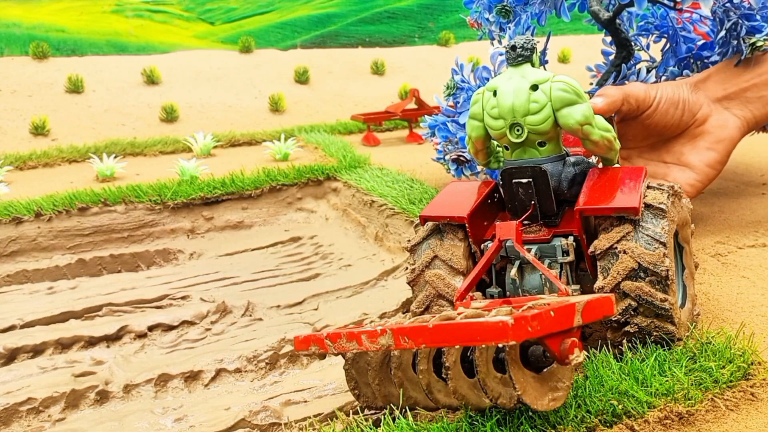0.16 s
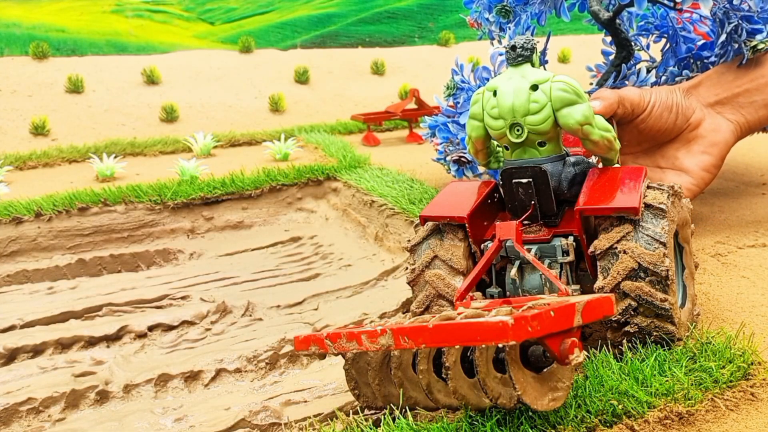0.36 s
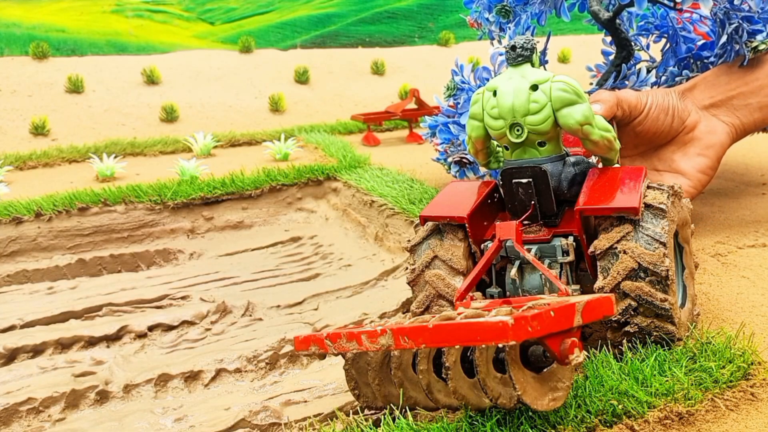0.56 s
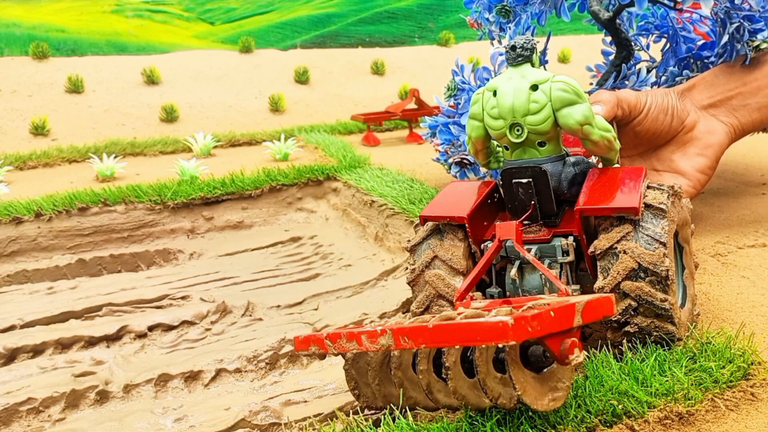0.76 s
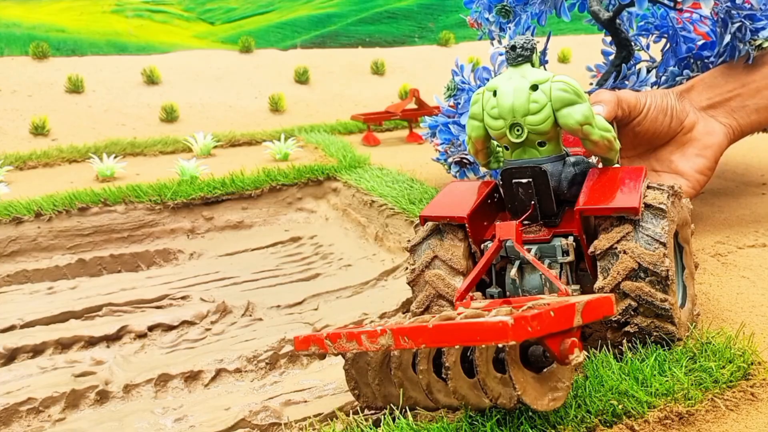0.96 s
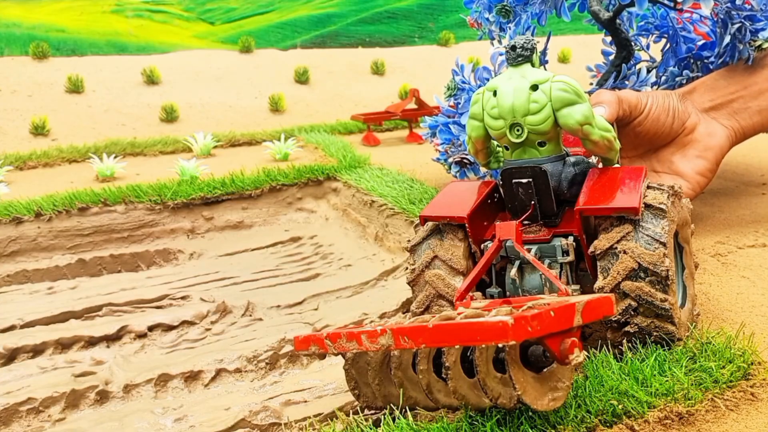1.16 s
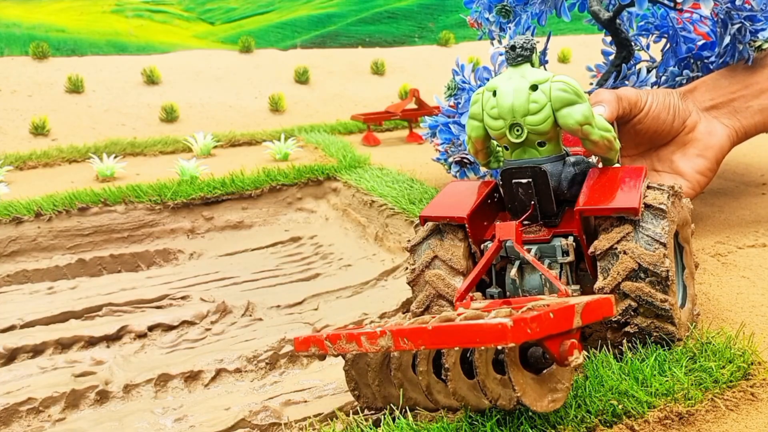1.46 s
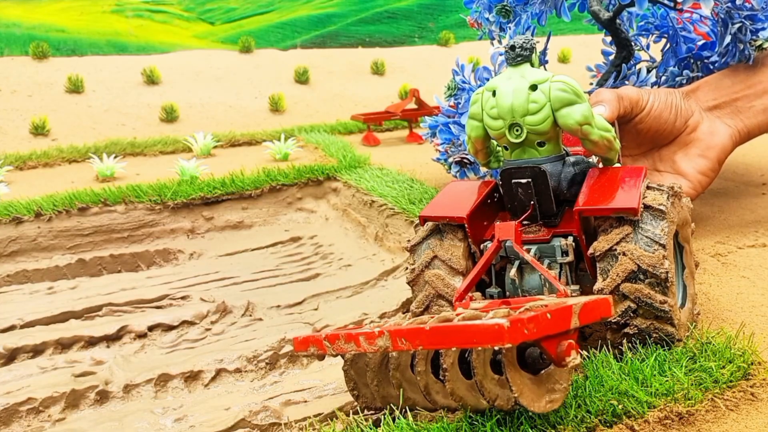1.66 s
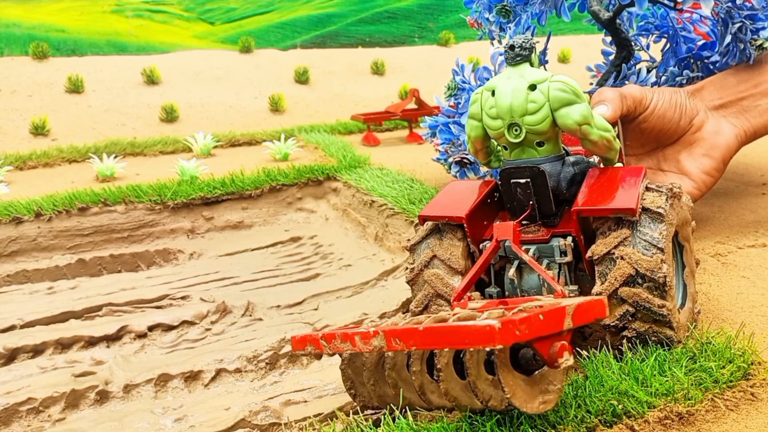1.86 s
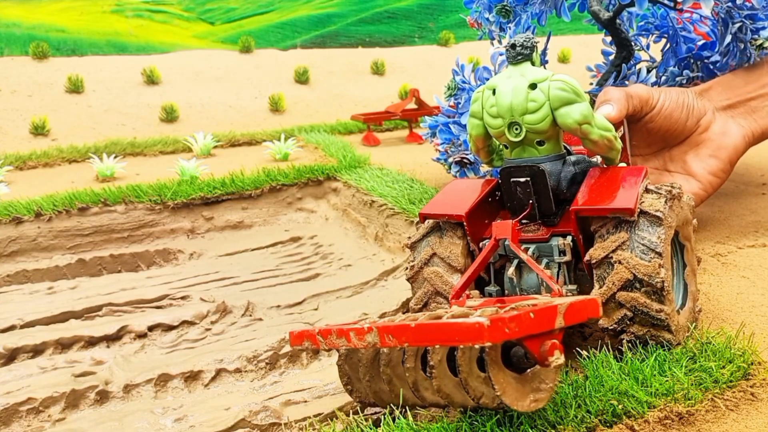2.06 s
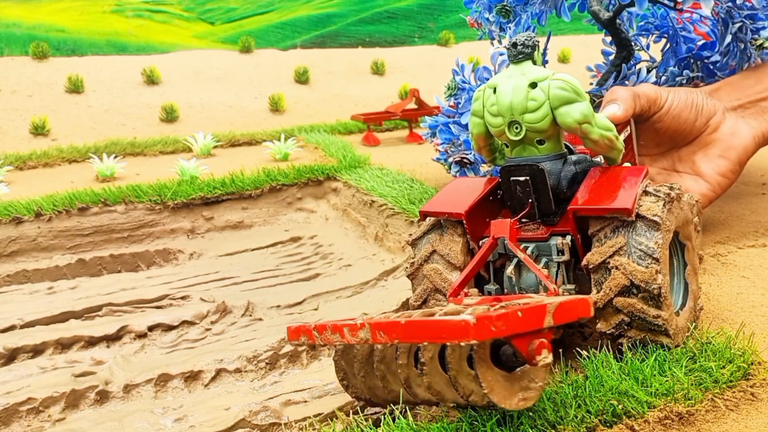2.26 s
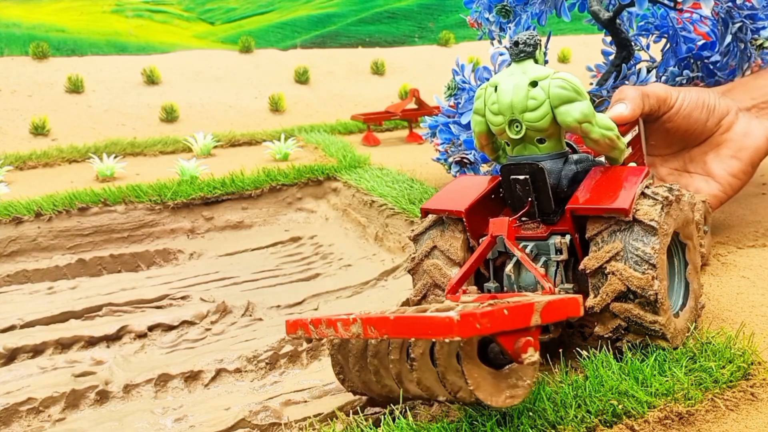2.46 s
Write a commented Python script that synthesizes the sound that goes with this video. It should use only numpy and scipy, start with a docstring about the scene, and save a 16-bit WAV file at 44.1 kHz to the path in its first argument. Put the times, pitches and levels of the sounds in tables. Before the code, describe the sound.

A toy tractor with a disc harrow, heard close. A low wavering idle rumbles until 0.6 s, with a loud hollow thump at 0.23 s and a wide gritty scrape from 0.35 to 0.55 s. Birds chirp throughout, exposed during the pause. The rumble returns at 1.15 s; metal clanks and knocks around 1.3-1.4 s, then denser from 2.0 to 2.5 s with rubbing soil. Faint hiss.

```python
"""Toy tractor and disc harrow in mud

A toy tractor drags a disc harrow over a low idling rumble (wavering harmonics) that drops out for half a second.
One hard thump (decaying modes and a crack) and a gritty scrape (random grains) come first; then the hitch
ticks, knocks and clanks (struck modes) and the discs rub through soil (uneven noise). Small birds chirp
(gliding sines) throughout, over a faint hiss. Only the opening sounds are wide; the rest sits in the middle.
"""
import sys
import numpy as np
from scipy import signal
from scipy.fft import rfft, irfft
from scipy.io import wavfile

SR = 44100
rng = np.random.default_rng(int(sys.argv[2]) if len(sys.argv) > 2 else 0)


def wrap_up_sound(samples):
    """Save the sound to the file named by the first command line argument, as 16-bit audio."""
    columns = np.atleast_2d(samples).T
    # keep every value between -1 and 1, then stretch to whole-number steps
    tamed = np.clip(columns, -1, 1)
    steps = np.round(tamed * 32767).astype(np.int16)
    wavfile.write(sys.argv[1], SR, steps)


N = 114660
TIME = np.arange(N) / SR


def from_db(db):
    """Logarithmic level: 20 dB is a factor of ten in amplitude."""
    return 10 ** (np.asarray(db) / 20)


def rms_one(x):
    """Normalisation of the mean power to 1."""
    return x / np.sqrt(np.mean(x ** 2) + 1e-20)


def level(rows):
    """Amplitude envelope interpolated linearly in decibels from (t/s, level/dB) rows."""
    return from_db(np.interp(TIME, *np.transpose(rows)))


def at_hz(points, hz):
    """Spectral table interpolated on a logarithmic frequency axis."""
    f, v = np.transpose(points)
    return np.interp(np.log(hz + 1), np.log(f), v)


def drift(rate):
    """Random fluctuation of rms 1: white noise through a double real pole at the given rate in Hz."""
    pole = np.exp(-2 * np.pi * rate / SR)
    white = rng.standard_normal(N + SR // 2)
    # the first half second is the filter's settling and is discarded
    return rms_one(signal.lfilter([1], [1, -2 * pole, pole * pole], white)[-N:])


def gate(start, end, attack, release):
    """Trapezoidal envelope with linear attack and release; the release passes one half at the end time."""
    rise = np.clip((TIME - start) / attack, 0, 1)
    fall = np.clip((end - TIME) / release + .5, 0, 1)
    return rise * fall


def dull(x, hz):
    """Second-order low-pass attenuation of the treble."""
    return signal.sosfilt(signal.butter(2, min(hz, .45 * SR), fs=SR, output="sos"), x + 1e-18)


def colour(spectrum, width=None, source=None):
    """Spectral shaping of noise or a given pair of signals to rms 1, with side content if given a width."""
    hz = np.arange(N // 2 + 1) * SR / N
    both, side = rfft(rng.standard_normal((2, N)) if source is None else source)
    if width is not None:
        both = both + from_db(at_hz(width, hz)) * side * [[1], [-1]]
    low_cut = hz / (hz + 10)
    return rms_one(irfft(both * from_db(at_hz(spectrum, hz)) * low_cut, N))


def room(x, t60):
    """Diffuse reverberation: convolution with exponentially decaying noise of unit energy."""
    tail = rng.standard_normal(SR) * from_db(-60 * TIME[:SR] / t60)
    return signal.fftconvolve(x, tail / np.sqrt(np.sum(tail ** 2)))[:N]


def patchy(x, depth_db, rate):
    """Independent modulation of adjacent bands: each half octave from 700 Hz up flickers by itself."""
    octaves = np.log2(np.clip(np.arange(N // 2 + 1) * SR / N, 700, 15000) / 700)
    spectrum, total = rfft(x), 0
    for k in range(10):
        band = np.clip(1 - np.abs(2 * octaves - k), 0, 1)  # overlapping triangles
        total = total + irfft(spectrum * band, N) * from_db(depth_db * drift(rate))
    return rms_one(total)


def hiss():
    """Stationary broadband noise whose level rises at the start."""
    # hiss spectrum: f/Hz, relative level/dB per Hz
    air = [(25, 15), (70, -10.5), (150, -13), (260, -1.5), (700, -6.5), (2000, -1), (4000, -10), (6500, -5),
           (10000, -13.5), (15000, -27)]
    settled_db, start_db, rise_s = -58, -3, 0.37  # start_db is relative to the settled level
    return from_db(settled_db + start_db * np.clip(1 - TIME / rise_s, 0, 1)) * colour(air)


def rumble():
    """Harmonic series on a wandering fundamental: wavering orders of an idling beat in low noise."""
    # runs of the rumble: start t/s, end t/s, level/dB, side noise level/dB
    runs = [(0.066, 0.617, -39, -15.5), (1.153, 2.7, -38, -76)]
    # harmonic orders: multiple of the fundamental, level/dB
    orders = [(1, -6.5), (2, -12), (3, -16), (4, -28), (5, -29)]
    # middle and side noise spectra: f/Hz, relative level/dB per Hz
    middle_noise, side_noise = [(20, 4), (35, -9.5), (60, 4.5), (100, -5.5), (160, -17), (250, -17),
                                (400, -30.5), (700, -31.5), (1500, -41.5), (12000, -76.5)], [(30, -16), (100, -7.5), (250, -13), (700, -15), (4000, -20),
                                                (9000, -55)]
    # swell: t/s, level/dB
    swell = [(0.1, 0.5), (0.5, -1), (1.17, 2.5), (1.45, -3), (1.65, 1.5), (1.82, -1.5), (1.95, 1.5),
             (2.3, 0), (2.6, 0)]
    fundamental_hz, wander_share, flutter_db, noise_db = 58.68, 0.02903, 4, -1.5

    turn = 2 * np.pi * np.cumsum(fundamental_hz * (1 + wander_share * drift(7.6))) / SR
    mid = from_db(noise_db) * colour(middle_noise)
    for multiple, db in orders:
        tone = np.sin(multiple * turn + rng.uniform(0, 2 * np.pi))
        mid = mid + from_db(db) * rms_one(from_db(flutter_db * drift(6.3)) * tone)
    side = colour(side_noise) * np.array([[1], [-1]])
    total = 0
    for start, end, db, side_db in runs:
        total = total + from_db(db) * gate(start, end, 0.025, 0.056) * (mid + from_db(side_db) * side)
    return level(swell) * total


def note(start, length, first, middle, last, db, rough, shake, flutter):
    """Frequency modulation: a sine glides on a parabola through three pitches; roughness jitters its pitch."""
    attack_s, release_s, jitter_share = 0.0025, 0.015, 0.05
    envelope = gate(start, start + length, attack_s, release_s)
    on, out = envelope > 0, np.zeros(N)
    u = np.clip((TIME[on] - start) / length, 0, 1)
    hz = first + (last - first) * u + 4 * (middle - (first + last) / 2) * u * (1 - u)
    turn = 2 * np.pi * np.cumsum(hz * (1 + jitter_share * rough * shake[on])) / SR
    out[on] = from_db(db) * envelope[on] * flutter[on] * np.sin(turn)
    return out


def birds():
    """Gliding tones with reverberation, dry thin whistles and a noise band for blurred distant chatter."""
    # single notes: start t/s, length t/s, first f/Hz, middle f/Hz, last f/Hz, level/dB, roughness
    single_notes = [(0.514, 0.016, 4540, 4470, 4300, -35, 0.7), (0.584, 0.028, 4890, 4840, 3880, -45.5, .8),
                    (0.588, 0.029, 4370, 3800, 3400, -45, 0.53), (0.661, 0.04, 4280, 4160, 4050, -51.5, .7),
                    (0.735, .026, 5100, 5260, 4460, -39, .2), (0.76, 0.023, 4560, 5250, 5250, -41, 0.36),
                    (0.791, 0.03, 4920, 4200, 4120, -45, 0.4), (0.878, 0.022, 4950, 5180, 4050, -35, 0.25),
                    (0.897, 0.014, 4110, 4080, 3950, -35, 0), (0.908, 0.0212, 3960, 3400, 3100, -41.5, 0.4),
                    (1.032, 0.02, 4450, 3900, 3350, -50, 0.4), (1.044, 0.023, 3460, 3226, 3240, -37.5, 0.1),
                    (1.1, 0.03, 3740, 3400, 3000, -49.5, 0.1),
                    (1.218, 0.025, 4480, 3990, 3550, -43.5, 0.44),
                    (1.288, 0.052, 3480, 3455, 3950, -45, 0.65), (1.322, 0.11, 3330, 3304, 3025, -40, 0.42),
                    (1.56, 0.07, 3700, 3915, 3170, -52.5, 0.5), (1.69, 0.047, 4190, 4180, 3980, -51, 1.1),
                    (1.743, 0.045, 2820, 3560, 3780, -54.5, .3), (1.8, 0.033, 3540, 3620, 3520, -48.5, 0),
                    (1.888, 0.039, 3080, 3120, 3000, -47, .15),
                    (1.982, 0.028, 3960, 3600, 3400, -45.5, 0.2),
                    (2.088, 0.053, 4030, 3455, 3230, -37.5, 0.5), (2.139, .11, 3880, 4400, 4420, -41.5, 0),
                    (2.135, 0.1, 3130, 2950, 2786, -43, 0.35)]
    # thin steady whistles, dry and clean: same columns
    thin_whistles = [(0.004, 0.14, 7400, 7350, 7260, -46, 0.05), (0.13, 0.21, 7250, 7400, 6900, -57, 0.2),
                     (0.245, 0.11, 3770, 3780, 3770, -51, 0), (0.18, 0.14, 2900, 2930, 2700, -56, 0.15)]
    # arched chirps of a quick twitter: start t/s, top f/Hz, level/dB
    chirps = [(1.02, 7300, -49.5), (1.053, 7900, -46.5), (1.055, 5750, -49.5), (1.085, 6850, -48),
              (1.11, 5950, -48), (1.135, 6350, -50), (1.143, 8550, -54.5), (1.147, 6900, -47),
              (1.167, 6800, -50)]
    # flurries of faint chirps: start t/s, end t/s, lowest top f/Hz, highest top f/Hz, level/dB
    flurries = [(1.009, 1.165, 6000, 9780, -59.5), (1.059, 1.192, 3990, 8020, -55),
                (1.481, 1.989, 3200, 4730, -56)]
    # distant chatter over time: t/s, level/dB
    chatter_level = [(0.0, -66.5), (0.6, -52), (0.85, -64), (1.0, -55.5), (1.33, -51), (1.61, -50.5),
                     (1.665, -57), (1.79, -49), (1.87, -54.5), (1.92, -51), (2.29, -44.5), (2.34, -60)]
    # distant chatter spectrum: f/Hz, relative level/dB per Hz
    chatter = [(1500, -32), (2600, -3), (3200, 4), (4200, 3.5), (5000, -5), (6500, -19), (10000, -24.5)]
    chirp_s, chirp_bend, chirp_rough, flurry_rough = .024, .15, .22, .5
    flutter_db, echo_t60_s, echo_db = 3.5, 0.32, -5.5

    shake, flutter = drift(466), from_db(flutter_db * drift(103))
    arches = [(*row, chirp_rough) for row in chirps]
    for start, end, low, high, db in flurries:
        for when, pitch in rng.random(size=(14, 2)):
            top_hz = low * (high / low) ** pitch
            arches.append((start + when * (end - start), top_hz, db, flurry_rough))
    notes = list(single_notes)
    for start, top_hz, db, rough in arches:
        edge_hz = top_hz * (1 - chirp_bend)
        notes.append((start, chirp_s, edge_hz, top_hz, edge_hz, db, rough))

    calls = sum(note(*row, shake, flutter) for row in notes)
    whistles = sum(note(*row, shake, np.ones(N)) for row in thin_whistles)
    echo = from_db(echo_db) * room(calls, echo_t60_s)
    return calls + whistles + echo + level(chatter_level) * colour(chatter)


def drag(uneven_db):
    """Friction noise: discs rub unevenly through the soil and grate once; clods roll under the wheels."""
    # discs and clods over time: t/s, level/dB
    disc_level, clod_level = [(1.12, -73.5), (1.28, -54), (1.42, -45.5), (1.65, -54.5), (1.85, -55),
                              (1.95, -48.5), (2.125, -44), (2.145, -44), (2.326, -44.5), (2.336, -58),
                              (2.6, -46)], [(1.85, -92), (1.89, -45), (2.03, -44), (2.1, -67),
                                                  (2.31, -47), (2.35, -66)]
    # spectra of the rubbing discs, the grating and the clods: f/Hz, relative level/dB per Hz
    rubbing, grating, clods = [(40, 15), (150, 12.5), (300, 9), (600, 0.5), (1100, -3), (1600, -5),
                               (2600, -4.5), (4500, -11), (7000, -36), (10000, -27.5), (14000, -47)], [(400, -26), (700, 10.5), (950, -44), (1100, 15.5), (1300, -16),
                                             (2400, -1), (5000, -9), (12000, -36)], [(80, -15), (170, -2), (320, -6.5), (600, -21.5),
                                                            (4000, -56)]
    grate = from_db(-40.5) * gate(2.23, 2.33, attack=0.087, release=.007) * colour(grating)
    unevenness = from_db(uneven_db * drift(57))
    return unevenness * (level(disc_level) * colour(rubbing) + grate + level(clod_level) * colour(clods))


def scrape(uneven_db):
    """Granular friction: dense random impulses of grit in a brightening hiss, with a few coarse snaps."""
    # scrape over time: t/s, level/dB
    scrape_level = [(0.335, -54.5), (0.365, -32.5), (0.435, -28), (0.46, -35.5), (0.505, -29), (0.547, -34),
                    (0.555, -43), (0.6, -102)]
    # scrape spectrum: f/Hz, relative level/dB per Hz
    grit_spectrum = [(200, 4), (600, -3.5), (1300, 1.5), (1700, -2.5), (2300, 5), (3000, 2.5), (3700, 2.5),
                     (5000, 1), (6500, 3), (8500, 2.5), (12000, 0.5), (15000, -5)]
    # stereo width: f/Hz, side minus middle level/dB
    width = [(60, 3), (400, -5.5), (700, -6), (1300, -38), (4400, -23), (8000, -8.5), (15000, -8.5)]
    # coarse grit snaps: t/s, level/dB, brightness f/Hz
    snap_rows = [(0.3688, -21, 6500), (0.3862, -20.5, 11000), (0.437, -26, 9000), (0.491, -23, 15000),
                 (0.501, -23, 12000), (0.5055, -24, 9000), (0.5285, -25, 7000)]
    grains_per_s, spread_db, hiss_share, snap_t60_s = 3500, 2.3, 0.6, 0.0051
    soft_hz, brighten_s = 6700, 0.12

    grain_gain = from_db(spread_db * np.minimum(rng.exponential(1, N), 4))
    grains = (rng.random(N) < grains_per_s / SR) * grain_gain * rng.standard_normal((2, N))
    burst, snaps = colour(grit_spectrum, width), 0
    for s, db, bright in snap_rows:
        decay = (TIME >= s) * from_db(db - 60 * np.abs(TIME - s) / snap_t60_s)
        snaps = snaps + dull(burst * decay, bright)
    raw = rms_one(grains) + hiss_share * rng.standard_normal((2, N))
    grit = patchy(colour(grit_spectrum, width, raw), depth_db=1.5, rate=60)

    # cross-fade from the dull to the full grit
    soft = dull(grit, soft_hz)
    brightness = np.clip((TIME - scrape_level[0][0]) / brighten_s, 0, 1)
    crunch = soft + brightness * (grit - soft)
    return level(scrape_level) * from_db(uneven_db * drift(120)) * crunch + snaps


def strikes(hits, modes, rattle, rattle_db, rattle_t60, vary_db):
    """Modal synthesis: hits ring damped modes of varied strength, tuning and decay, and start a dying rattle."""
    detune_share = 0.0082  # the modes shift a little with the load on the parts
    contact_hz = 7800  # no contact excites the modes far above this
    echo_t60_s, echo_db = 0.18, -7.5
    hz, mode_db, t60 = np.transpose(modes)[:, :, None]
    rings, rattles = np.zeros(N + SR), 0
    noise, age = colour(rattle), TIME[:SR // 3]
    for s, db, bright, share in hits:
        strength, tuning, sign = rng.standard_normal((3, len(modes), 1))
        # a lower brightness weakens the high modes
        gain = np.sign(sign) * from_db(db + mode_db + vary_db * strength) / np.hypot(1, (hz / bright) ** 2)
        decay = from_db(-60 * age / (t60 * share))
        partials = gain * decay * np.sin(2 * np.pi * hz * (1 + detune_share * tuning) * age)
        start = int(s * SR)
        rings[start:start + len(age)] += partials.sum(axis=0)
        rattle_decay = (TIME >= s) * from_db(db + rattle_db - 60 * np.abs(TIME - s) / rattle_t60)
        rattles = rattles + dull(noise * rattle_decay, bright)
    struck = rings[:N] + rattles + from_db(echo_db) * room(rings[:N], echo_t60_s)
    return signal.sosfilt(signal.butter(10, contact_hz, fs=SR, output="sos"), struck)


def hitch():
    """Impact excitation of three resonant parts: pin ticks, chassis knocks and harrow clanks."""
    # hits: t/s, level/dB, brightness f/Hz, ring length as a share of the free ring
    ticks, knocks, clanks = [(1.28, -43, 4070, 1), (1.491, -45.5, 3000, 0.86), (1.923, -39, 4000, 0.88),
                             (2.371, -41.5, 4000, 0.96), (2.584, -48, 3000, 1)], [(1.333, -33.5, 4000, 0.77), (2.006, -37.5, 3000, 0.8),
                                            (2.145, -36, 3000, 1), (2.185, -39, 2000, 0.9),
                                            (2.315, -36, 1200, 0.54), (2.425, -33, 4500, 0.67)], [(1.386, -27.5, 3000, 1),
                                                            (1.392, -29.5, 3670, .7),
                                                            (2.059, -21.5, 8200, 0.87),
                                                            (2.0655, -36, 4000, .6), (2.077, -37, 8000, .8),
                                                            (2.141, -29, 2920, 0.82),
                                                            (2.229, -26, 14000, 0.44),
                                                            (2.242, -30.5, 4170, 1),
                                                            (2.478, -25, 3060, 0.38),
                                                            (2.483, -31, 4130, 0.93)]
    # modes of the parts: f/Hz, level/dB, free-ring t60/s
    pin, chassis, harrow = [(2255, 2.5, 0.15), (2673, -1, 0.084), (4020, -7, 0.12)], [(137, 4.5, 0.074), (411, -7, 0.14), (614, -1, 0.019),
                                         (816, -6.5, 0.051), (3080, -7, 0.033)], [(1120, -18.5, 0.047), (1936, -12.5, 0.11),
                                                          (2251, -13, 0.14), (2700, -13, 0.049),
                                                          (2970, -8.5, .09), (3060, -9, 0.12),
                                                          (3570, -15, 0.15), (4037, -8, 0.14),
                                                          (4520, -11, 0.11), (5170, -10, 0.098),
                                                          (5790, -16, 0.069), (6870, -13, 0.12),
                                                          (7483, -14, 0.13)]
    # rattle spectra, one per kind of hit: f/Hz, relative level/dB per Hz
    tick_rattle, knock_rattle = [(60, 5), (160, 6.5), (320, -3), (550, 0), (900, 1), (1500, -11),
                                 (3000, -13), (6000, -34)], [(100, 9), (400, 7), (800, 3), (1500, -4), (3000, 0.5),
                                                      (7000, -7), (10000, -38)]
    clank_rattle = [(50, 2), (150, -7), (300, 7), (600, -7), (1100, 0.5), (1500, -9), (2200, -3.5),
                    (4500, 5), (7000, -11), (9000, -35), (15000, -45)]
    return (strikes(ticks, pin, tick_rattle, rattle_db=2.5, rattle_t60=0.14, vary_db=0.5)
            + strikes(knocks, chassis, knock_rattle, rattle_db=-5.0, rattle_t60=0.11, vary_db=0.5)
            + strikes(clanks, harrow, clank_rattle, rattle_db=-9.5, rattle_t60=0.19, vary_db=.5))


def thump(crack_db, crack_t60, pan_db, swell_s):
    """Transient excitation of a resonator: a wide crack on a hollow body that rings a little to the right."""
    # modes of the hollow body: f/Hz, level/dB, t60/s
    box = [(116.4, -13.5, 0.07), (158.6, 0, 0.06), (201, -14, 0.104), (733, -10, 0.028), (1180, -29, 0.02),
           (1820, -3, 0.013)]
    # crack spectrum: f/Hz, relative level/dB per Hz
    crack_spectrum = [(200, -1), (800, -3.5), (2000, -1), (3500, -6), (7500, -7), (12000, -12),
                      (15000, -21)]
    # stereo width: f/Hz, side minus middle level/dB
    width = [(200, -1), (1300, -13.5), (4400, -6), (8000, -6), (15000, -5)]
    start_s, overall_db = .229, -5.5
    age = np.maximum(TIME - start_s, 0)
    body = sum(from_db(db - 60 * age / t60) * np.sin(2 * np.pi * hz * age) for hz, db, t60 in box)
    panned = body * (1 - np.exp(-age / swell_s)) * from_db([[-pan_db / 2], [pan_db / 2]])
    crack = (age > 0) * from_db(crack_db - 60 * age / crack_t60) * colour(crack_spectrum, width)
    return from_db(overall_db) * (panned + crack)


def scene():
    """Linear superposition of all sources."""
    background = hiss() + rumble() + birds()
    implement = drag(uneven_db=1.5) + scrape(uneven_db=1.5) + hitch()
    return background + implement + thump(crack_db=-12.5, crack_t60=0.063, pan_db=4.0, swell_s=.0014)


def record(dry):
    """Soft saturation rounds the tall peaks, then an elliptic low-pass cuts the top steeply."""
    peak_limit, cutoff_hz = 1, 15200
    rounded = peak_limit * np.tanh(dry / peak_limit)
    return signal.sosfilt(signal.ellip(10, .2, 80, cutoff_hz, fs=SR, output="sos"), rounded)


dry = scene()
out = record(dry)
wrap_up_sound(out)
```